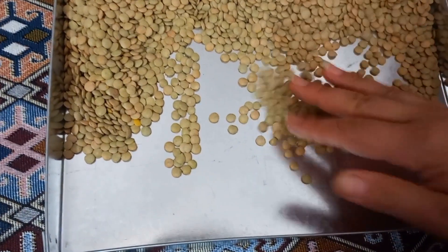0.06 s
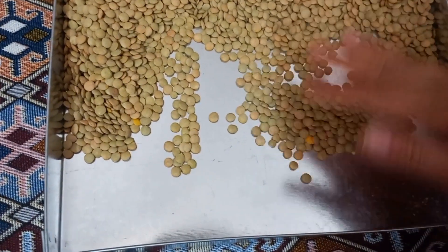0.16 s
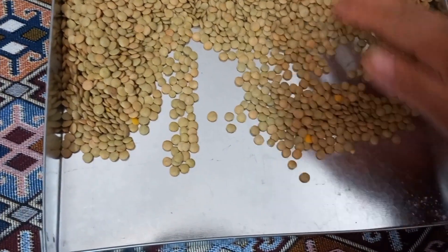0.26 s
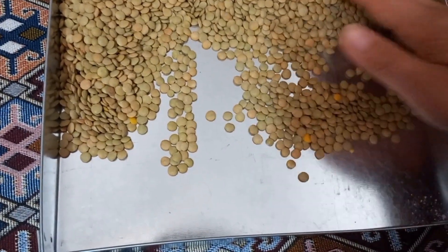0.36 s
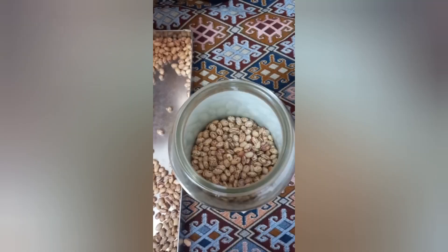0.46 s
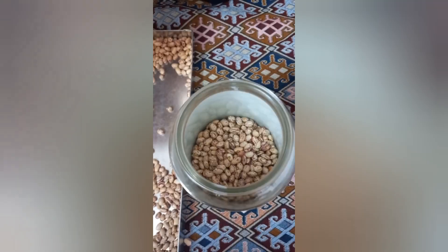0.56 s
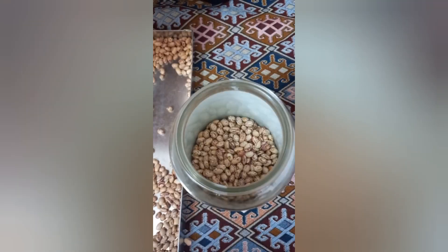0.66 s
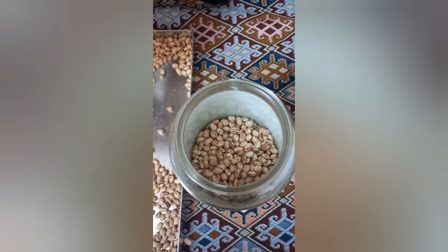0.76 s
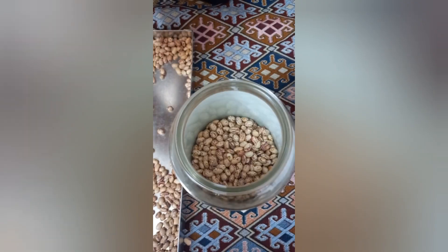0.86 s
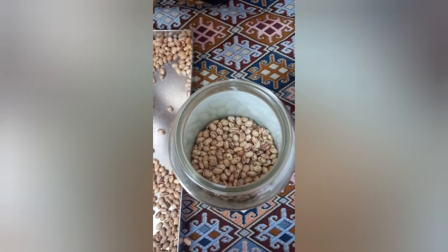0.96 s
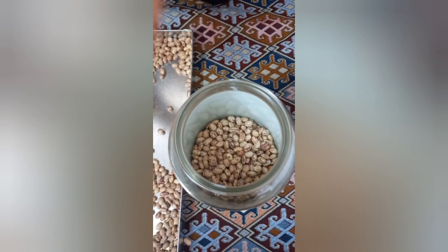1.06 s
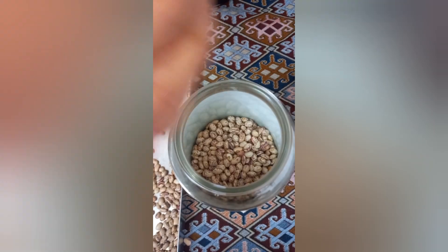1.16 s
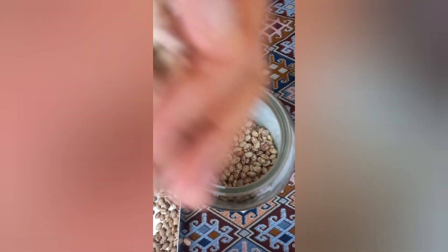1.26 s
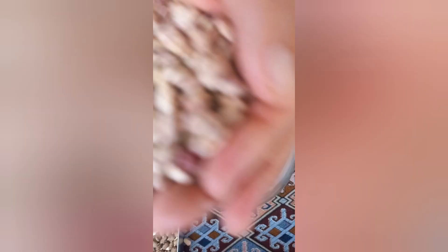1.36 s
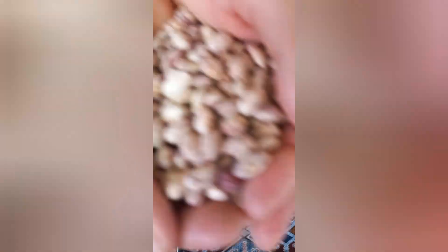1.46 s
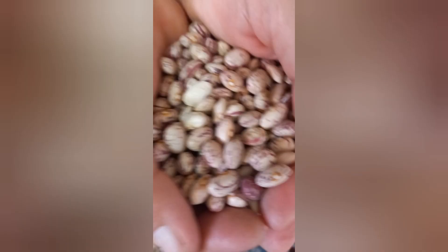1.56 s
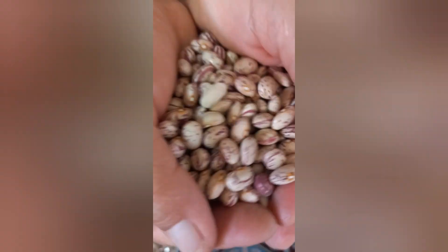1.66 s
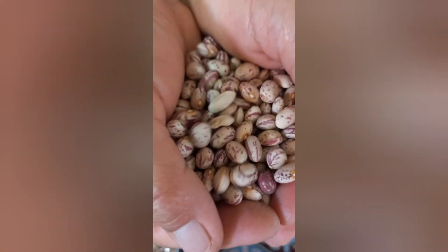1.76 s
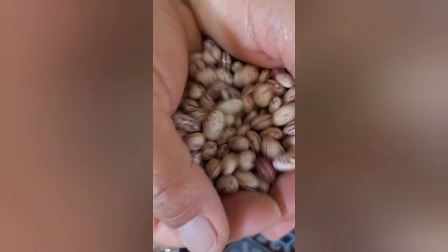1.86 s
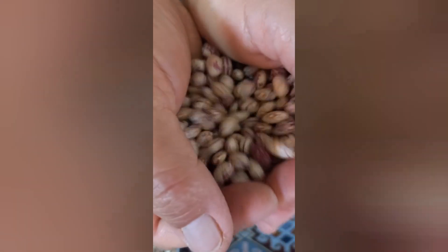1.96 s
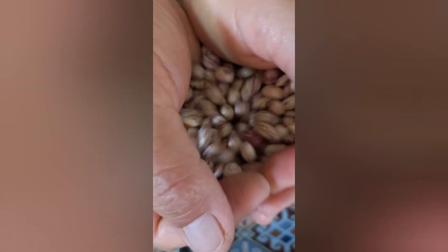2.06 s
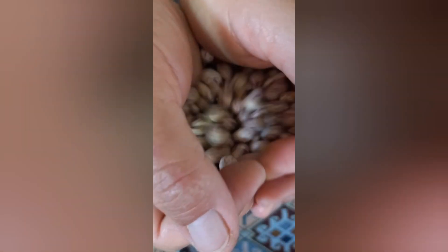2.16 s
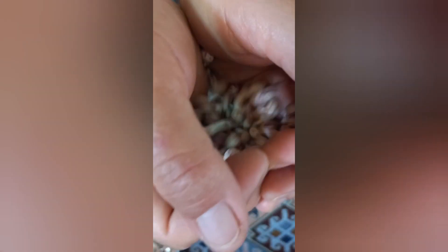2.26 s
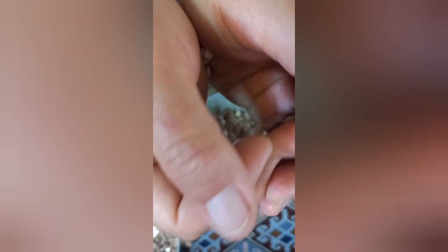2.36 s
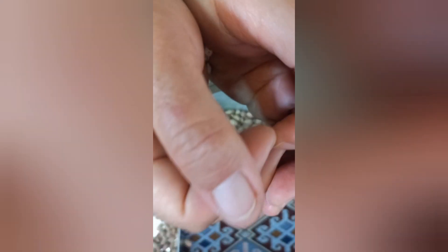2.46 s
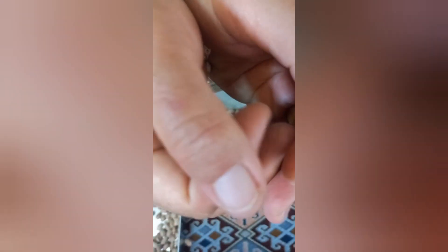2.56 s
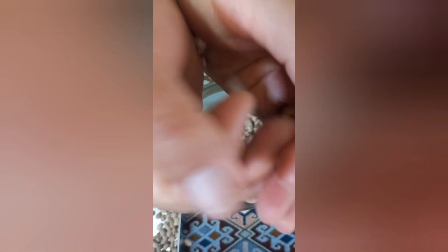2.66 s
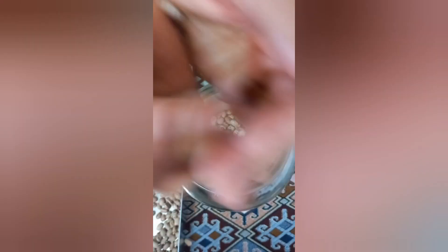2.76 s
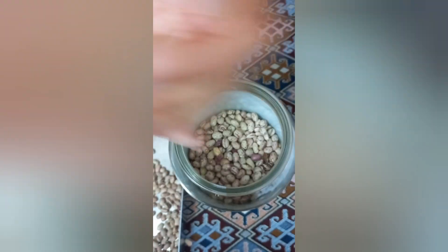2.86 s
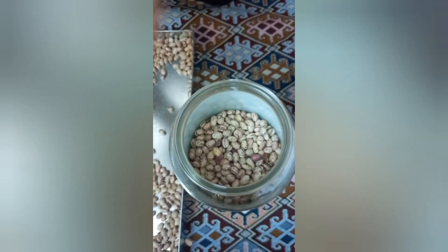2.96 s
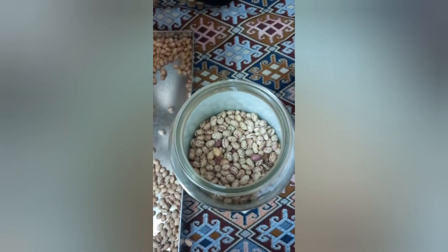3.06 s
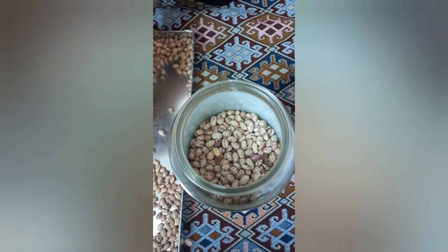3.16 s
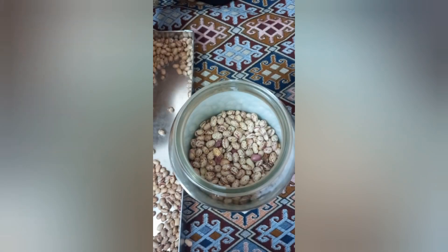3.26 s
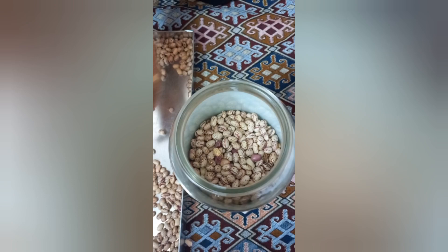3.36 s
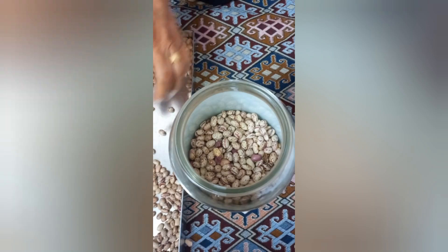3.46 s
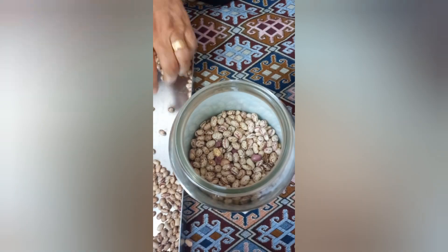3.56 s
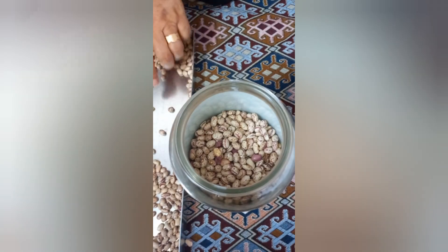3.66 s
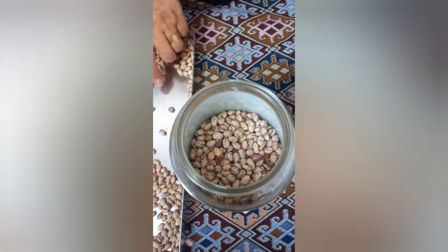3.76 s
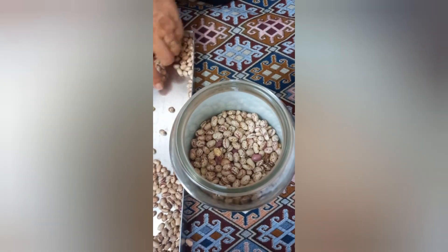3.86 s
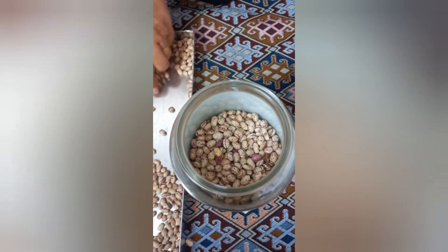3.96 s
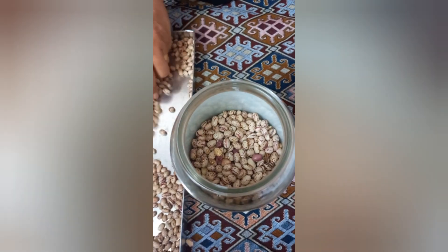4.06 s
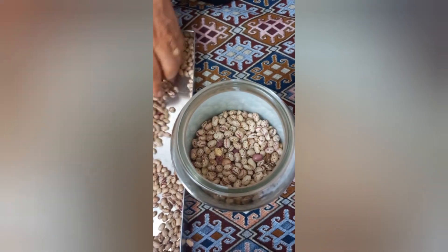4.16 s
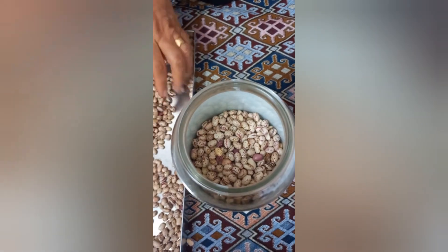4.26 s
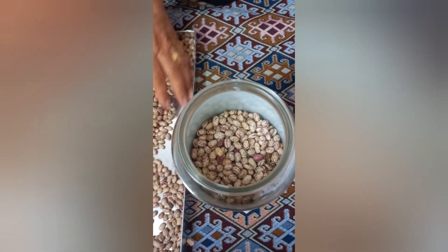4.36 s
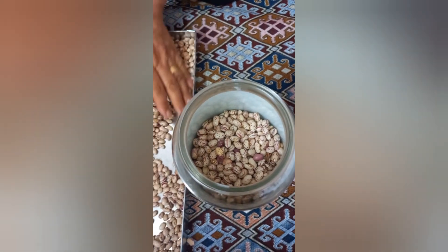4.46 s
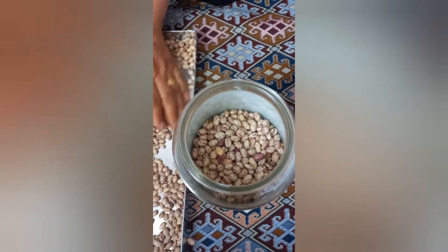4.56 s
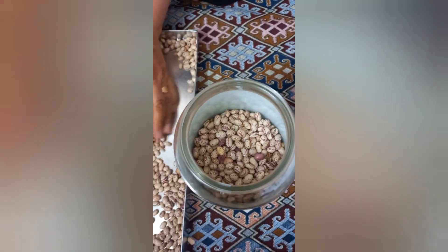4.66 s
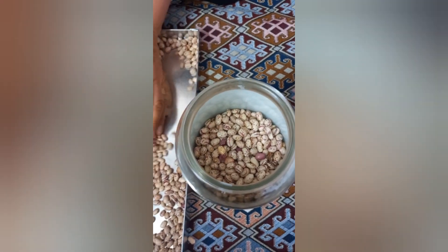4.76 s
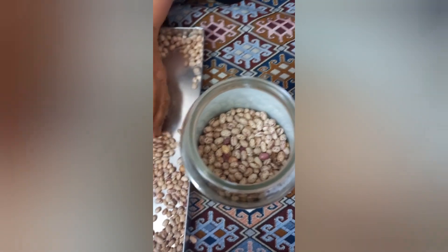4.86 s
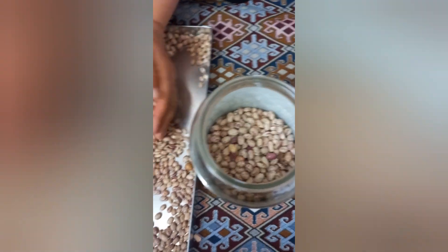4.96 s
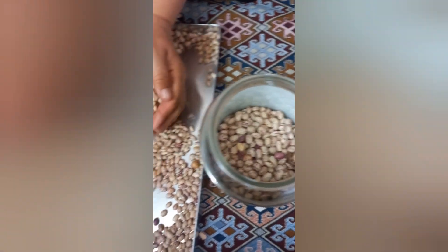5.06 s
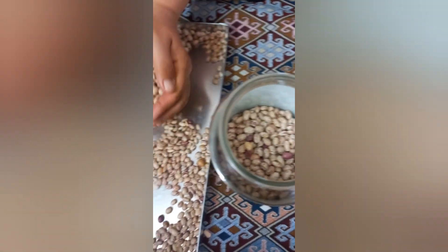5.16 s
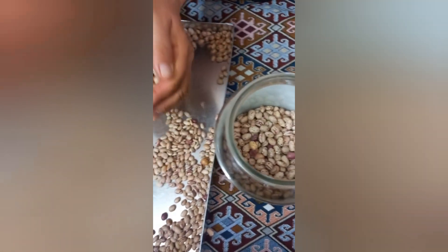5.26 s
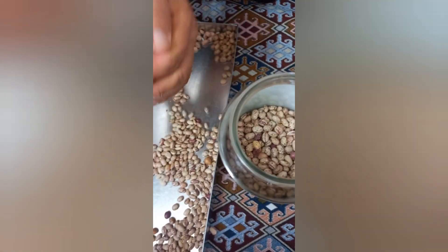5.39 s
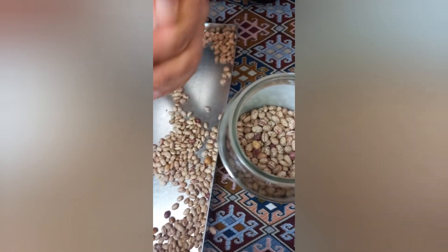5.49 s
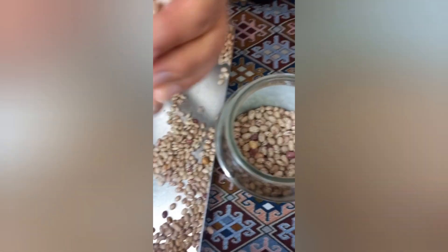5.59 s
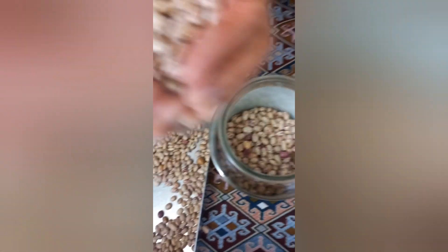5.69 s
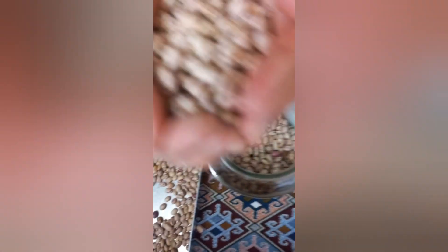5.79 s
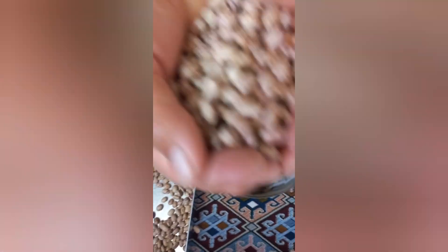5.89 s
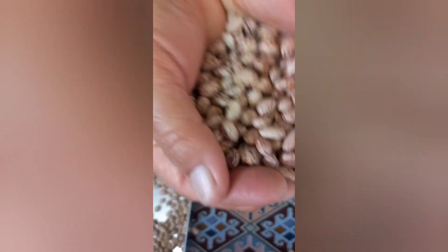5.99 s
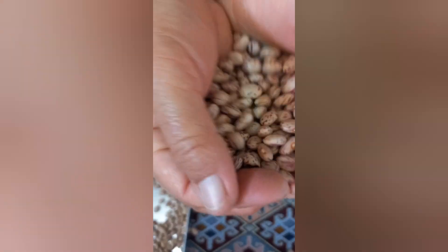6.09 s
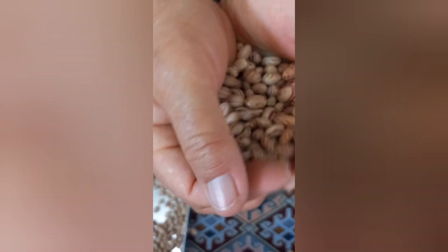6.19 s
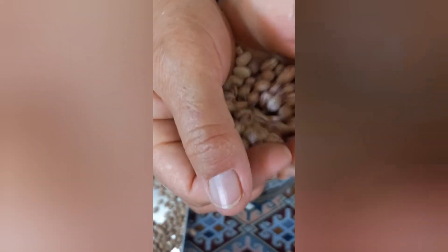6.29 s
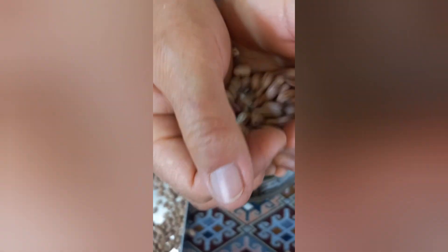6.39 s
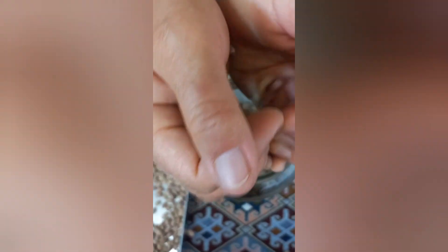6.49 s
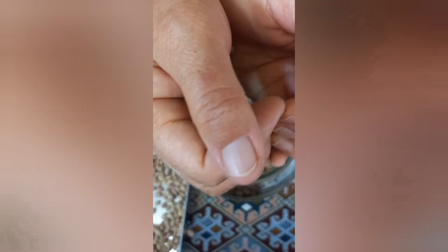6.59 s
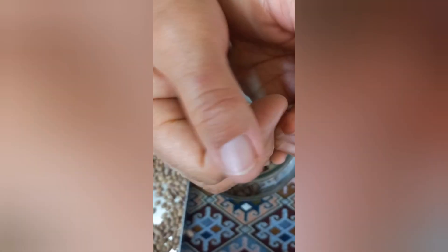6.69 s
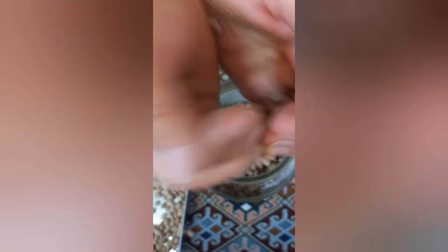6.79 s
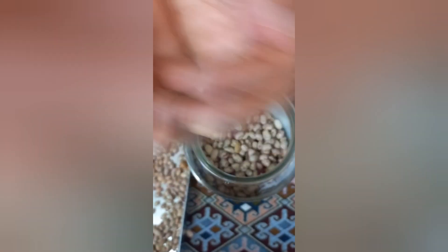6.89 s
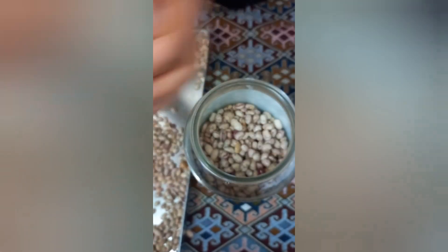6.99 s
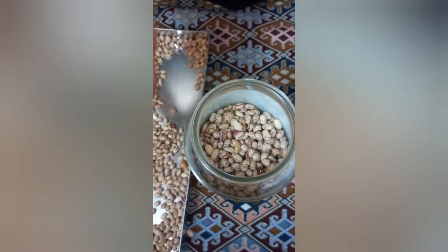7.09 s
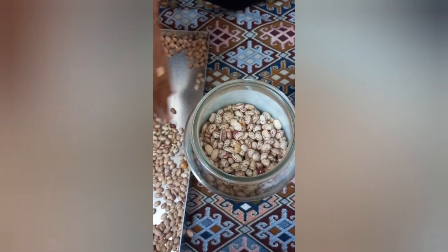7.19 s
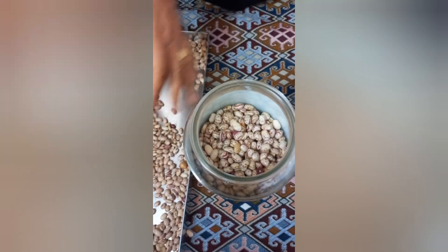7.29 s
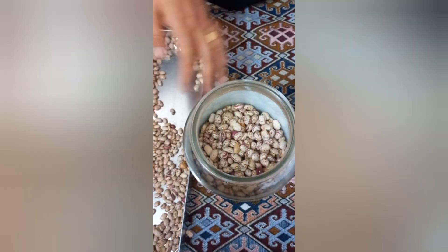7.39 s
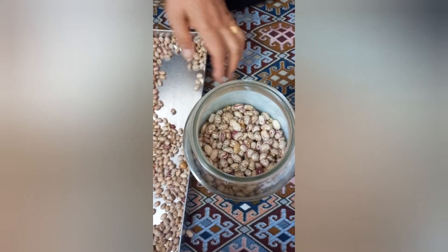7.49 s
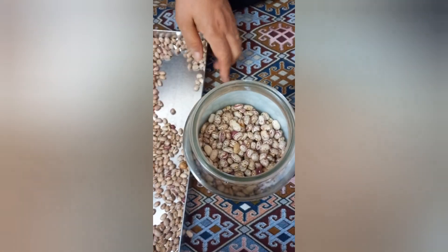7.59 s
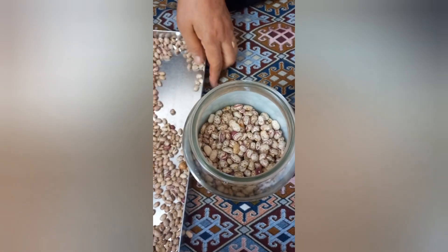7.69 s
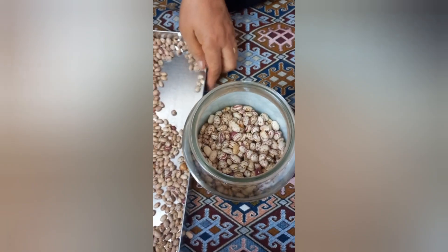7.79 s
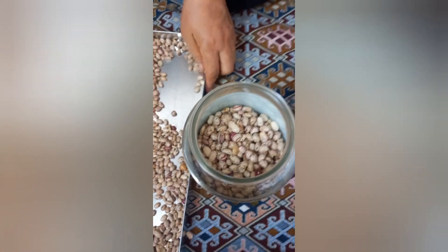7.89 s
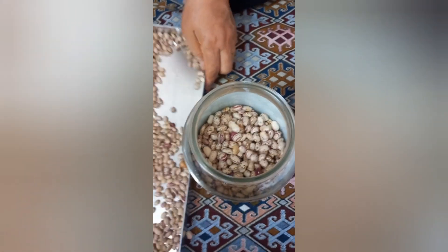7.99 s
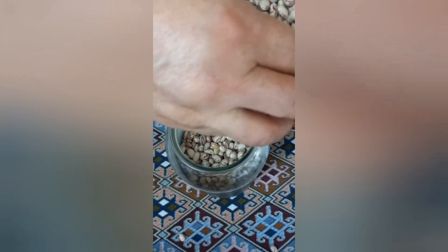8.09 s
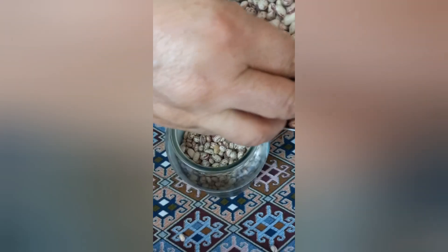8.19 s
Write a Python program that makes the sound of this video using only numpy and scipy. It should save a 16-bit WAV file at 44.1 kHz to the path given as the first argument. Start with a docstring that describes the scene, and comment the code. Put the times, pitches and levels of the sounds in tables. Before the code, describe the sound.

Close stereo microphone in a quiet room. Lentils swish briefly across a metal tray, then near silence with two soft bumps on the right. A handful of beans clatters into a glass jar with a hollow tone. Beans are raked over the ringing tray, a second handful pours into the jar, then sharp scattered clacks and small rim knocks follow.

```python
"""Dry rattling and clacking, close by in a quiet room: lentils and beans on a thin metal tray on a tablecloth.
A hand sweeps and rakes them, and twice a handful runs into a glass jar that sounds hollow under cupped hands.
Each rattle is a crowd of tiny noise bursts; resonances add the ring of the tray and the hollow tones of the jar.
Around them: stray beans, rim knocks, ticks, a short low tone, bumps on the right microphone port,
dull rubs on the cloth and faint room noise. Twice the level dips briefly."""
import sys
import numpy as np
from scipy import signal
from scipy.io import wavfile
from scipy.ndimage import uniform_filter1d

SR = 44100
rng = np.random.default_rng(int(sys.argv[2]) if len(sys.argv) > 2 else 0)


def materialize(psi):
    """Save the field psi as 16-bit PCM at rate SR to the path in sys.argv[1].

    A 1-D psi becomes a single channel; in a 2-D psi each row is a channel.
    """
    bounded = np.clip(np.atleast_2d(psi).T, -1, 1)
    quanta = np.round(bounded * 32767).astype(np.int16)
    wavfile.write(sys.argv[1], SR, quanta)


N = 363384
TIME = np.arange(N) / SR  # seconds
BAND_EDGES_HZ = np.geomspace(28, 19000, 25)

# All levels in the tables are relative: each source also has an overall gain or filter of its own.

# Hand movements through the seeds: strokes on the tray, sweeps through the lentils, stirring of another seed.
# Each row: start in seconds, rise in seconds, hold in seconds, fall in seconds, level in dB,
# treble compared with the body in dB.
RAKE_STROKES = [(3.738, 0.0032, .03, .02, -54, -10), (3.775, 0.13, .33, .11, -23, -1),
                (4.289, 0.0054, .075, 0.15, -32.5, -6), (4.45, .12, 0.068, 0.37, -25.5, -4),
                (4.76, .16, 0.034, 0.14, -22, -2.5), (4.98, 0.041, 0.11, .03, -32.5, -2),
                (5.15, 0.011, 0.048, 0.047, -45.5, -11), (5.222, 0.0026, 0.0051, 0.073, -36.5, 3),
                (7.152, 0.0058, 0.021, 0.043, -46.5, -10), (7.222, .005, .05, 0.19, -29.5, 3),
                (7.47, 0.0058, 0.043, 0.067, -38.5, -2), (7.64, 0.024, 0.011, 0.17, -50.5, 0),
                (7.82, 0.013, 0.27, 0.022, -45.5, -2.5)]
LENTIL_SWEEPS = [(0.0, 0.00067, 0.098, 0.071, -26.5, -0.5), (.19, 0.15, 0.078, 0.023, -35, -0.5)]
STIR_STROKES = [(8.049, 0.0054, .2, .05, -38, -4.5)]
# Handfuls running into the jar. Each row: start, rise, hold and fall in seconds, clatter level in dB,
# treble level in dB, hollow level in dB, first rush in dB, neck tone in Hz, depth tone in Hz.
JAR_POURS = [(1.659, 0.22, 0.49, 0.28, -29.5, -23, -41.5, 4.5, 233, 1040),
             (6.113, .17, 0.26, .22, -31, -23, -38, 0.5, 282, 824)]
# Single beans and fingertips on the tray, and single beans landing hard in the jar.
# Each row: time in seconds, level in dB, tilt towards the treble in dB per octave (above 1 kHz).
TRAY_DROPS = [(0.1016, -19, -1), (.121, -19, 9), (.342, -16, 19), (3.2085, -12.5, -3.5), (3.3172, -14.5, 0),
              (3.3343, -15, -2.5), (3.4177, -28, -7), (3.494, -26.5, -5), (3.555, -26.5, -4.5),
              (3.7729, -9.5, 2), (3.8345, -14, 3), (3.8679, -7.5, -1.5), (3.9864, -3.5, -3.5),
              (4.1681, 0, -1), (4.2323, -3, 7), (4.2886, -4, -3), (4.3144, 3, 0), (4.3543, -8, -3),
              (4.415, -12.5, -0.5), (4.511, -3, -2), (4.5635, -13, 5), (4.6174, -10, -10), (4.831, -14, 2),
              (4.9033, -20, 5), (4.955, -37, -7), (5.057, -9.5, -2), (5.125, -11.5, 4), (5.2225, -4, -2),
              (7.1494, 2.5, 2.5), (7.1539, -1.5, 10), (7.2211, 0, 2.5), (7.231, -2.5, 7), (7.269, -16, -2),
              (7.292, 0, 3.5), (7.3003, -6, 2), (7.321, -1.5, 6.5), (7.3492, 0, -0.5), (7.4, -4.5, 1),
              (7.476, -15.5, -6.5), (7.4979, -8, 1), (7.592, -22.5, -3), (7.6025, -17.5, 2),
              (7.7766, -23.5, 2)]
JAR_LANDINGS = [(1.6424, -9.5, -1.5), (1.654, -14, -2), (1.7411, -9.5, -2), (1.7798, -4.5, -1),
                (1.8356, -3, -2), (1.9561, -6.5, -0.5), (2.1357, -4.5, 1), (2.1622, -3, -0.5),
                (2.412, -11.5, 0), (2.516, -5, 1.5), (2.5945, -8, 2.5), (2.6158, -10, 7),
                (2.6444, -16.5, -0.5), (2.7026, -14.5, -2), (2.7113, -9.5, -1.5), (2.728, -21.5, -4.5),
                (6.117, -15, -4), (6.1299, -6.5, 2), (6.2288, -8.5, 1), (6.6778, -8, 11), (6.793, -13.5, 6),
                (6.844, -28.5, -4.5), (6.8654, -16, 5), (6.873, -25, -8.5)]
# Beans knocked against the tray rim. Each row: time in seconds, level in dB, ring in Hz.
RIM_KNOCKS = [(7.409, -12, 1870), (7.418, -21, 1750), (7.4207, -9.5, 2020), (7.827, -21, 1390),
              (7.844, -14.5, 2180), (7.867, -16, 1290), (7.8845, -7.5, 1620), (7.892, -10.5, 1800),
              (7.9717, -24, 1510), (7.993, -25, 1600), (8.0093, -9, 1090)]
# Beans ticking together in the hand. Each row: time in seconds, level in dB.
HAND_TICKS = [(1.035, -33.5), (1.3227, -47), (2.777, -50), (2.8364, -46), (2.855, -49), (3.441, -37),
              (3.736, -37), (5.183, -33), (5.5983, -43), (6.031, -41), (6.072, -39), (6.102, -34)]
# Bumps on the right microphone port. Each row: time in seconds, level in dB.
PORT_BUMPS = [(0.6923, 1), (.7101, 5.5), (2.6058, 1.5)]
# Dull rubs as jar and arm shift on the cloth. Each row: start in seconds, level in dB.
CLOTH_RUBS = [(5.28, -42), (5.34, -38), (5.428, -40.5), (5.51, -48), (5.563, -43.5), (5.62, -52),
              (5.714, -45), (5.81, -54), (7.476, -49), (7.59, -46), (7.7, -52), (7.788, -51)]
# Room noise over time. Each row: time in seconds, level in dB.
ROOM_LOUDNESS = [(0, -47), (.6, -52), (1.6, -48.5), (2.4, -53.5), (2.95, -60), (3.6, -58.5), (4.5, -51),
                 (6.3, -50.5), (7.0, -57), (8.24, -52)]
# Brief dips of the whole sound. Each row: start in seconds, end in seconds.
LEVEL_DIPS = [(0.412, 0.451), (8.021, 8.047)]

# Colour of each noise, dull to bright. Each row: frequency in Hz, density level in dB.
TRAY_SPECTRUM = [(71, -53), (120, -23), (239, -13.5), (331, -8.5), (431, -13.5), (585, -3.5), (648, -12),
                 (747, -3.5), (1290, -2.5), (1900, -3), (2190, -1), (2630, -4), (3030, -2), (15400, -6.5)]
LENTIL_SPECTRUM = [(71, -9), (120, 1), (184, -12), (265, 4.5), (611, 0), (1020, 1), (1530, -1),
                   (1830, -2.5), (3440, -1.5), (6330, -13.5), (15500, -14)]
STIR_SPECTRUM = [(71, -31), (120, -8), (163, -10), (586, -5.5), (812, -9), (1190, -11), (3660, 1),
                 (4760, -2.5), (15500, -14)]
JAR_SPECTRUM = [(71, -40), (120, -21), (212, -11), (254, -9), (431, -4.5), (609, -17), (861, -11),
                (1220, -10), (1620, -12.5), (1940, -7), (2150, -5), (2680, -6.5), (3640, -3), (6560, -6),
                (15400, 0)]
TICK_SPECTRUM = [(1000, -37), (3000, -12), (5000, 2.5), (8000, -14), (15500, -1)]
RUB_SPECTRUM = [(18, -50), (30, -29.5), (58, -5.5), (87, -1), (127, -10.5), (247, -26), (300, -42),
                (390, -59), (660, -120)]
ROOM_SPECTRUM = [(18, -60), (30, -39.5), (102, 0.5), (177, -12.5), (270, -14), (324, -18.5), (399, -9.5),
                 (467, -17), (808, -10.5), (1020, -16), (1440, -14), (1910, -18.5), (2830, -22.5),
                 (7860, -36.5), (15500, -36.5)]
# Resonances of the tray and upper resonances of the jar. Each row: frequency in Hz, width in Hz, level in dB.
TRAY_RESONANCES = [(380, 120, 1), (578, 77, -4), (950, 12, -8.5), (1157, 40, -12), (1430, 34, -16),
                   (1300, 45, -7), (1480, 61, -23), (2160, 250, -3), (3060, 51, -3.5)]
JAR_RESONANCES = [(1630, 91, -8.5), (3730, 520, -4.5), (5360, 250, -12)]
# How alike the two microphone ports hear a noise. Each row: frequency in Hz, likeness from -1 to 1.
PORT_LIKENESS = [(100, 0.85), (300, 0.7), (640, 0.46), (1400, 0.15), (3000, -0.15), (7000, 0), (15000, 0)]
# Balance of the two sides. Each row: frequency in Hz, left minus right in dB.
TRAY_BALANCE = [(200, -0.5), (700, 5.5), (1300, -1.5), (2400, 2), (5000, 4), (15000, 2)]
JAR_BALANCE = [(60, 3.5), (110, 3.5), (200, 1.0), (380, 0.5), (700, 4.7), (1290, 1.9), (2380, 1.6),
               (4400, 8), (8120, 10.6), (15000, 6.6)]
ROOM_BALANCE = [(100, 1), (1000, 1.8), (10000, 1)]
RUB_BALANCE = [(60, -24), (250, -19)]  # rubbing is heard more on the right

# Every movement swells from this far down; the treble swings wider than the body.
SWELL_DB, TREBLE_FOLLOWS = 13, 1.2
# The hand slows during a movement.
LENTIL_SAG_DB_PER_S, RAKE_SAG_DB_PER_S = 63, 1.5
# A stroke dies slowly at first, then quickly as the hand lifts.
STROKE_FALL_CURVE = 1.44
# The flow eases as the hands empty; the first rush booms in the hollow more than it clatters.
POUR_SAG_DB_PER_S, RUSH_S, RUSH_BOOM = 3.5, 0.068, 1.7
# As the hands part the neck tone climbs and the depth tone sinks; both settle on the open jar's notes.
NECK_OCTAVES_PER_S, DEPTH_OCTAVES_PER_S, UNCOVER_S = .45, -0.36, 0.17
OPEN_NECK_HZ, OPEN_DEPTH_HZ = 372, 870
# The resonance across the jar wavers a little.
CROSS_HZ, CROSS_WAVER_HZ = 2180, 22
# Once two handfuls are gone, the lighter tray booms at a low note.
EMPTIED_S, BOOM_HZ, BOOM_WIDTH_HZ, BOOM_DB = 7.0, 524, 71, 2
RUB_RISE_S, RUB_HOLD_S, RUB_FALL_S = 0.0058, 0.014, 0.094
CUTOFF_HZ = 15900


def raked_beans():
    """Beans tumble over the metal; the harder the stroke, the more collide."""
    body, treble = strokes(RAKE_STROKES, RAKE_SAG_DB_PER_S)
    voices = impacts(TRAY_SPECTRUM, TRAY_BALANCE, crack_t60=0.0049, tail_db=-5.5, tail_t60=0.16,
                     room_db=-11.5, count=12, patchy_db=3)
    collisions_per_s = 200 + 700 * body / body.max()
    stream = rattle(voices, collisions_per_s, spread_db=4.5, clump_db=4.5)
    return from_db(-1) * press(tray_ring(stream, ring_db=-2.5), body, treble, split_hz=4030)


def tray_hits():
    """Single beans drop on the tray and make it ring."""
    times, levels_db, tilt = np.transpose(TRAY_DROPS)
    hits = impacts(TRAY_SPECTRUM, TRAY_BALANCE, crack_t60=0.024, tail_db=-12.5, tail_t60=0.14,
                   room_db=-20.5, count=len(times), tilt_db=tilt[:, None, None], patchy_db=5)
    return from_db(8.5) * tray_ring(place(times, levels_db, hits), ring_db=0.5)


def rim_hits():
    """Knocks at the stiff rim have a pitched ring."""
    times, levels_db, ring_hz = np.transpose(RIM_KNOCKS)
    hits = impacts(TRAY_SPECTRUM, TRAY_BALANCE, crack_t60=0.025, tail_db=-9.5, tail_t60=0.092,
                   room_db=-24.5, count=len(times), patchy_db=1.6)
    ringing = [hit + from_db(14.5) * resonate(hit, hz, width_hz=460) for hit, hz in zip(hits, ring_hz)]
    return from_db(6) * place(times, levels_db, ringing)


def tray_ring(x, ring_db):
    """The sheet rings briefly, damped by its load and the cloth."""
    boom = from_db(BOOM_DB) * resonate(x * (TIME > EMPTIED_S), BOOM_HZ, BOOM_WIDTH_HZ)
    ring = sum(from_db(db) * resonate(x, hz, width) for hz, width, db in TRAY_RESONANCES)
    return x + boom + from_db(ring_db) * ring


def jar_stream():
    """Beans clack on beans, bright and dry, and set the air in the jar sounding."""
    clatter, treble, hollow = handfuls()
    voices = impacts(JAR_SPECTRUM, JAR_BALANCE, crack_t60=0.0018, tail_db=-14.5, tail_t60=0.022,
                     room_db=-24, count=12, patchy_db=3, rise_s=0.00014)
    collisions_per_s = 150 + 750 * treble / treble.max()
    clacks, air = jar_air(rattle(voices, collisions_per_s, spread_db=3.5, clump_db=3))
    dry_clatter = press(cut(clacks, 310, "high", order=1), clatter, treble, split_hz=7800)
    return from_db(0.5) * dry_clatter + from_db(-2) * hollow * rms_one(air)


def jar_hits():
    """The heaviest and the last beans land in the jar on their own."""
    times, levels_db, tilt = np.transpose(JAR_LANDINGS)
    hits = impacts(JAR_SPECTRUM, JAR_BALANCE, crack_t60=0.0089, tail_db=-13.5, tail_t60=.05,
                   room_db=-29, count=len(times), tilt_db=tilt[:, None, None], patchy_db=3.5)
    left_right_gain = from_db([[7], [2]])
    clacks, air = jar_air(left_right_gain * place(times, levels_db, hits))
    return clacks + from_db(7.5) * air


def jar_air(x):
    """Clacks excite the jar: returns them with its upper resonances, and the low hollow tone apart."""
    neck_hz, depth_hz = jar_tones()
    cross_hz = CROSS_HZ + CROSS_WAVER_HZ * drift(15)
    upper = sum(from_db(db) * resonate(x, hz, width) for hz, width, db in JAR_RESONANCES)
    clacks = x + from_db(5.5) * glide(x, cross_hz, width_hz=120) + upper
    # As the hands part, the neck tone rises and gives way to the depth tone.
    opening = np.log2(neck_hz / 280)
    neck = from_db(3 - 10.5 * opening) * glide(x, neck_hz, width_hz=41)
    lingering = from_db(-9) * resonate(x, 835, width_hz=7)  # the glass keeps one note a little longer
    depth_gain = from_db(4 + 20 * np.minimum(opening, .15))
    depth = depth_gain * (glide(x, depth_hz, width_hz=77) + lingering)
    return clacks, cut(neck + depth, 1500, "low", order=3)


def jar_tones():
    """Neck and depth tones in Hz: they glide while the cupped hands part, then settle on the open jar."""
    open_hz = np.array([[OPEN_NECK_HZ], [OPEN_DEPTH_HZ]])
    tones = open_hz * np.ones(N)
    for start, rise, hold, fall, *_, neck_hz, depth_hz in JAR_POURS:
        t = TIME - start
        until_open = rise + hold + fall - UNCOVER_S / 2 - t
        covered = np.clip(np.minimum(t, until_open) / UNCOVER_S + 1, 0, 1)
        neck = neck_hz * 2 ** (NECK_OCTAVES_PER_S * t)
        depth = depth_hz * 2 ** (DEPTH_OCTAVES_PER_S * t)
        tones = tones + covered * (np.array([neck, depth]) - open_hz)
    return tones


def handfuls():
    """Clatter, treble and hollow gains of the pours: a trickle, a rush, a steady run that thins out."""
    gains = 0
    for start, rise, hold, fall, clatter_db, treble_db, hollow_db, rush_db, _, _ in JAR_POURS:
        flow = movement(start, rise, hold, fall, POUR_SAG_DB_PER_S, curve=2.15)
        rush = rush_db * np.exp(-((TIME - start - rise) / RUSH_S) ** 2)  # in dB
        clatter = from_db(clatter_db + rush) * flow ** 0.96
        treble = from_db(treble_db) * flow ** TREBLE_FOLLOWS
        hollow = from_db(hollow_db + RUSH_BOOM * rush) * flow ** 0.42
        gains = gains + np.array([clatter, treble, hollow])
    return gains


def lentils():
    """Many light seeds slide under the fingers: thousands of tiny, short contacts a second."""
    voices = impacts(LENTIL_SPECTRUM, TRAY_BALANCE, crack_t60=0.0046, tail_db=-24, tail_t60=0.037,
                     room_db=-45, count=4, patchy_db=1.5)
    stream = rattle(voices, per_s=3500, spread_db=2, clump_db=2)
    body, treble = strokes(LENTIL_SWEEPS, LENTIL_SAG_DB_PER_S)
    return from_db(-3) * press(stream, body, treble, split_hz=6000)


def stirred_seeds():
    """A second kind of seed gives a softer, duller rustle, more to the left."""
    voices = impacts(STIR_SPECTRUM, JAR_BALANCE, crack_t60=0.0056, tail_db=-4, tail_t60=0.049,
                     room_db=-25, count=3, patchy_db=1)
    stream = rattle(voices, per_s=810, spread_db=2, clump_db=5)
    body, treble = strokes(STIR_STROKES)
    return press(stream, body, treble, split_hz=2930)


def ticks():
    """Tiny dry contacts between beans in the hand, with nothing to ring."""
    times, levels_db = np.transpose(HAND_TICKS)
    hits = impacts(TICK_SPECTRUM, ROOM_BALANCE, crack_t60=0.0034, tail_db=-17, tail_t60=0.048,
                   room_db=-45, count=len(times), patchy_db=0)
    return from_db(14.5) * place(times, levels_db, hits)


def hoot(start=0.369, end=0.419, from_hz=285, to_hz=236, level_db=-18, octave_db=-18):
    """A very short low tone, sagging in pitch, ends the sweep through the lentils."""
    along = np.clip((TIME - start) / (end - start), 0, 1)
    phase = 2 * np.pi * np.cumsum(from_hz + (to_hz - from_hz) * along) / SR
    tone = np.sin(phase) + from_db(octave_db) * np.sin(2 * phase)
    return from_db(level_db) * np.sin(np.pi * along) ** 2 * tone


def bumps(spike_s=0.00097, swing_hz=84, swing_t60=0.059, swing_db=-8):
    """A pressure spike at the right port, with a low swing that dies away."""
    t = np.arange(SR // 8) / SR
    swing = from_db(swing_db - 60 * t / swing_t60) * np.sin(2 * np.pi * swing_hz * t + 1)
    pulse = cut(0.95 * np.exp(-t / spike_s) - swing, 3500, "low")
    right_only = pulse * np.array([[0], [1]])
    times, levels_db = np.transpose(PORT_BUMPS)
    return cut(place(times, levels_db, [right_only] * len(times)), 54, "high", order=3)


def cloth_rubs():
    """Low noise of flickering strength, let through in short dull strokes."""
    flicker = from_db(drift(25))[None]
    noise = rms_one(paint(flicker, RUB_SPECTRUM, RUB_BALANCE)[0])
    gain = sum(from_db(db) * movement(s, RUB_RISE_S, RUB_HOLD_S, RUB_FALL_S) for s, db in CLOTH_RUBS)
    return gain * noise


def background():
    """Room noise of slowly changing level and the cloth rubs; the microphone drops the deepest bass."""
    level = from_db(np.interp(TIME, *np.transpose(ROOM_LOUDNESS)))
    room_noise = level * rms_one(paint(np.ones((1, N)), ROOM_SPECTRUM, ROOM_BALANCE)[0])
    return cut(room_noise + cloth_rubs(), 56, "high", order=4)


def movement(start, rise, hold, fall, sag_db_per_s=0, curve=1):
    """Gain of one hand movement: it swells, eases off while it lasts, and drops 20 dB over its fall."""
    t = TIME - start
    swell_db = SWELL_DB * np.clip(t / max(rise, 1e-4) - 1, -1, 0)
    ease_db = sag_db_per_s * np.clip(t - rise, 0, abs(hold))
    fall_db = 20 * (np.maximum(t - rise - hold, 0) / max(fall, 1e-4)) ** curve
    return (t >= 0) * from_db(np.maximum(swell_db - ease_db - fall_db, -200))


def strokes(rows, sag_db_per_s=0):
    """Body and treble gains of seeds pushed by the hand: the faster, the brighter."""
    body_power = treble_power = 0
    for *timing, db, bright_db in rows:
        speed = movement(*timing, sag_db_per_s, STROKE_FALL_CURVE)
        body_power = body_power + (from_db(db) * speed) ** 2
        treble_power = treble_power + (from_db(db + bright_db) * speed ** TREBLE_FOLLOWS) ** 2
    return np.sqrt([body_power, treble_power])


def impacts(colour, side, crack_t60, tail_db, tail_t60, room_db, count=8, tilt_db=0, patchy_db=10.0,
            room_t60=0.43, treble_t60=0.28, rise_s=0.00019):
    """Seed impacts of unit energy: a hard crack, the ring of what is hit and a faint room tail."""
    t = np.arange(SR // 5) / SR
    # A t60 is the time in seconds in which a part falls by 60 dB.
    parts = [(0, crack_t60), (tail_db, tail_t60), (room_db, room_t60)]
    decay = np.sqrt(sum(from_db(db - 60 * t / t60) ** 2 for db, t60 in parts))
    shape = decay * (1 - np.exp(-t / rise_s))
    out = paint(np.tile(shape, (count, 1)), colour, side, patchy_db, tilt_db)
    dull = cut(out, 4400, "low", order=1)
    out = dull + (out - dull) * np.exp(-np.log(1000) * t / treble_t60)  # the treble dies first
    energy = np.sum(out.mean(1) ** 2, axis=1)
    return out / np.sqrt(energy)[:, None, None]


def rattle(voices, per_s, spread_db, clump_db):
    """Collisions come in little avalanches, unequal in size, each sounding one of the voices."""
    born = rng.random(N) < per_s * from_db(clump_db * drift(70)) / SR
    strength = from_db(spread_db * np.minimum(rng.exponential(1, N), 4))
    sizes = born * strength * rng.choice([-1, 1], N)
    sizes = sizes / np.sqrt(np.abs(uniform_filter1d(sizes ** 2, size=2200)) + 1e-4)  # evens the level
    dealt = rng.integers(0, len(voices), N)
    out = 0
    for k, voice in enumerate(voices):
        out = out + signal.oaconvolve((sizes * (dealt == k))[None], voice, axes=1)[:, :N]
    return out


def press(x, body, treble, split_hz):
    """Set the strength of the dull and the sharp part of a rattle."""
    dull = rms_one(cut(x, split_hz, "low", order=3))
    sharp = rms_one(cut(x, split_hz, "high", order=3))
    return body * dull + treble * sharp


def paint(shape, colour, side, patchy_db=0, tilt_db=0):
    """Stereo noises under envelopes (count, samples), coloured band by band: (count, 2, samples)."""
    # Two independent noise sets take turns, so neighbouring bands do not share a noise.
    white = rng.standard_normal((2, 2, len(shape), 1, shape.shape[1])) * shape[:, None]
    out, sign = 0, np.array([[1], [-1]])  # left, right
    for k, edges in enumerate(zip(BAND_EDGES_HZ, BAND_EDGES_HZ[1:])):
        hz = np.sqrt(np.prod(edges))
        if hz > colour[-1][0] * 2:
            break
        mid, apart = white[k % 2]
        alike = np.clip(at_hz(PORT_LIKENESS, hz), -.9, .98)
        width = np.sqrt((1 - alike) / (1 + alike))
        band = cut(mid + width * apart * sign, edges, "band")
        own_db = patchy_db * rng.standard_normal((len(shape), 1, 1)) + tilt_db * np.log2(max(hz, 1000) / 4000)
        out = out + band * from_db(at_hz(colour, hz) + own_db + sign * at_hz(side, hz) / 2)
    return out


def place(times, levels_db, sounds):
    """Lay sounds on the time line."""
    out = np.zeros((2, N + SR))
    for s, db, sound in zip(times, levels_db, sounds):
        first = int(s * SR)
        out[:, first:first + sound.shape[1]] += from_db(db) * sound
    return out[:, :N]


def resonate(x, hz, width_hz):
    """A resonance with gain 1 on top."""
    r = np.exp(-np.pi * width_hz / SR)
    feed = np.array([1, 0, -1]) * (1 - r * r) / 2
    return signal.lfilter(feed, [1, -2 * r * np.cos(2 * np.pi * hz / SR), r * r], x + 1e-18)


def glide(x, hz, width_hz):
    """A resonance whose centre follows a curve: shift it down to 0 Hz, smooth, shift back up."""
    r = np.exp(-np.pi * width_hz / SR)
    turn = np.exp(2j * np.pi * np.cumsum(hz) / SR)
    smooth = signal.lfilter([1 - r], [1, -r], x / turn + 1e-18)
    return 2 * (smooth * turn).real


def drift(per_s):
    """Slow chance: random points, per_s of them a second, joined by straight lines."""
    return np.interp(TIME * per_s, np.arange(2000), rng.standard_normal(2000))


def cut(x, hz, kind, order=2):
    """Keep the low, the high or a band of the sound."""
    return signal.sosfilt(signal.butter(order, hz, kind, fs=SR, output="sos"), x + 1e-18)


def from_db(db):
    """Turn dB into a gain factor."""
    return 10 ** (np.asarray(db) / 20)


def rms_one(x):
    """Scale so that the mean of both channels has rms 1."""
    return x / np.sqrt(np.mean(np.atleast_2d(x).mean(0) ** 2) + 1e-20)


def at_hz(points, hz):
    """Read a table of (Hz, value) at one frequency, along a logarithmic scale."""
    table_hz, values = np.array(points).T
    return np.interp(np.log(hz), np.log(table_hz), values)


def scene():
    """All sources together: tray, jar, small sounds and background."""
    tray = raked_beans() + tray_hits() + rim_hits() + lentils() + stirred_seeds()
    jar = jar_stream() + jar_hits()
    return tray + jar + ticks() + hoot() + bumps() + background()


def record(dry):
    """The level dips twice by 28 dB, peaks are rounded and the top is cut."""
    live = np.ones(N)
    for start, end in LEVEL_DIPS:
        live[(TIME > start) & (TIME < end)] = from_db(-28)
    dipped = dry * uniform_filter1d(live, size=160)  # soft edges
    rounded = 1.303 * np.tanh(dipped / 1.267)
    top_cut = signal.ellip(10, .2, 80, CUTOFF_HZ, fs=SR, output="sos")
    return signal.sosfilt(top_cut, rounded)


dry = scene()
out = record(dry)
materialize(out)
```